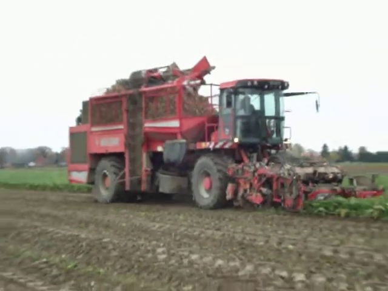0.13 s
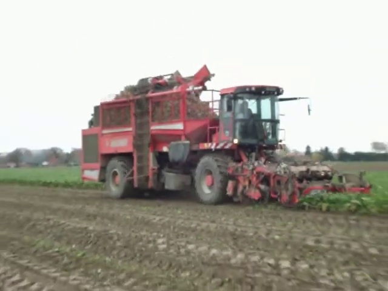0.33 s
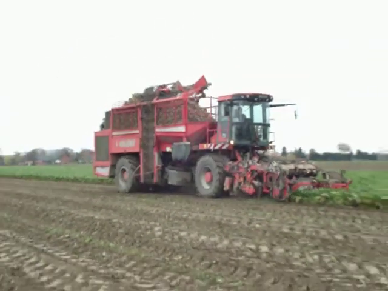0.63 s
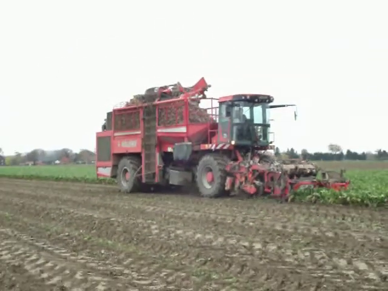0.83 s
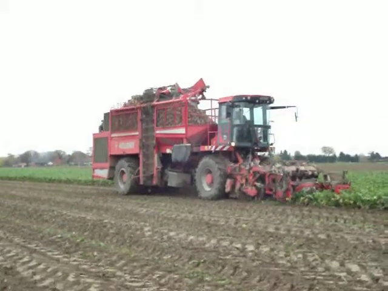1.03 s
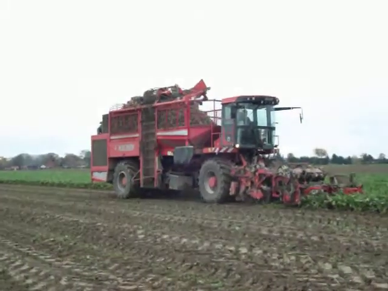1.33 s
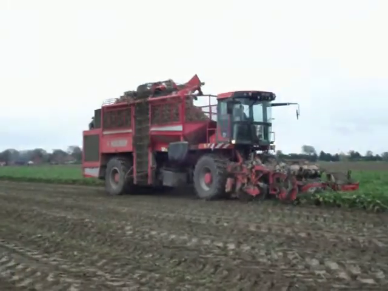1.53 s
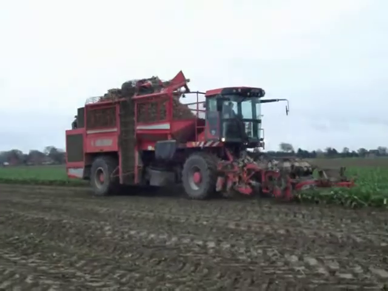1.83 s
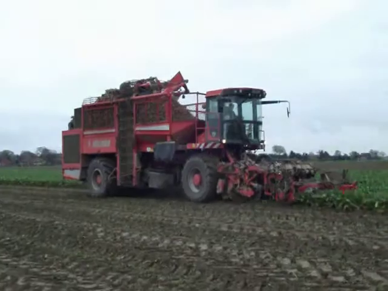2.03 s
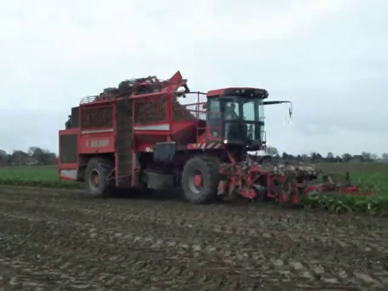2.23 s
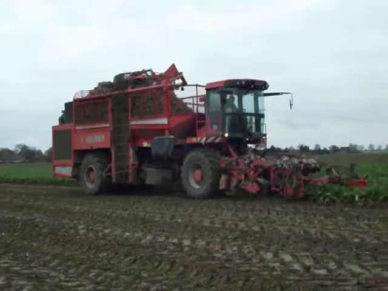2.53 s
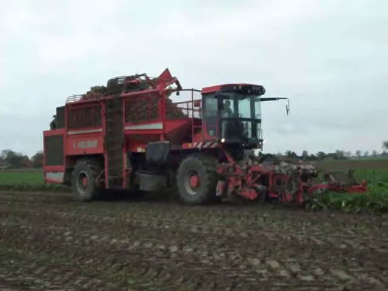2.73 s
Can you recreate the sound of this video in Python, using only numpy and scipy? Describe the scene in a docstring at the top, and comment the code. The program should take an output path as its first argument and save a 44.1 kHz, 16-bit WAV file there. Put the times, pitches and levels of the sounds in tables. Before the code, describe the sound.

A large harvester drones, whines and rattles steadily while wind buffets the microphone.

```python
"""A beet harvester works across a field at steady revs: diesel drone, whining drives, rattling sieve chain.
From the start, wind buffets the microphone; each gust pushes a fast limiter down, so the machine's roar
flutters and ducks. The chain clatters hardest under load near 0.8 s. Small eddies knock on the
microphone at about 1.3, 2.1 and 2.6 s, and a drive shaft's whine swells towards the end."""
import sys
import numpy as np
from scipy import signal
from scipy.fft import rfft, irfft, next_fast_len
from scipy.io import wavfile
from scipy.ndimage import uniform_filter1d, minimum_filter1d, map_coordinates

SR = 44100
rng = np.random.default_rng(int(sys.argv[2]) if len(sys.argv) > 2 else 0)


def digitize_waveform(pressure):
    """Quantize a signal to 16-bit integers and store it at the path in sys.argv[1].

    Rows of a 2-D input are taken as channels; values are limited to [-1, 1].
    """
    field = np.atleast_2d(pressure).T
    bounded = np.clip(field, -1, 1)
    quanta = np.round(bounded * 32767).astype(np.int16)
    wavfile.write(sys.argv[1], SR, quanta)


N = 126567
T = np.arange(N) / SR

# tone colour of the chain's struck steel: frequency_hz, relative_db
STEEL_SPECTRUM = [(300, -15), (600, 3.5), (1300, 3.5), (2200, 1), (2800, 4.5), (3200, 7), (3550, -1.5),
                  (4200, -12.5), (5100, -17), (5900, -30)]


def amp(db):
    """Decibels to gain."""
    return 10 ** (np.asarray(db) / 20)


def unit(x):
    """Scale to rms 1."""
    return x / np.sqrt(np.mean(x ** 2) + 1e-20)


def curve(rows):
    """One value per sample from (time_s, value) points."""
    return np.interp(T, *np.transpose(rows))


def wobble(rate):
    """A smooth random curve, rate knots a second."""
    return map_coordinates(rng.standard_normal(1024), [T * rate + 2], mode="wrap")


def filtered(x, response):
    """Filter x with a gain given as a function of frequency."""
    size = next_fast_len(N + 8192)
    return irfft(rfft(x, size) * response(np.fft.rfftfreq(size, 1 / SR)), size)[:N]


def coloured(x, spectrum):
    """x through (frequency_hz, relative_db) points, rolled off above the last, at rms 1."""
    points_hz, db = np.transpose(spectrum)
    shape = lambda hz: amp(np.interp(np.log(hz + 1), np.log(points_hz + 1), db))
    return unit(filtered(x, lambda hz: shape(hz) / (1 + (hz / points_hz[-1]) ** 20)))


def noise(spectrum):
    """Noise of the given spectrum, at rms 1."""
    return coloured(rng.standard_normal(N), spectrum)


def tone(hz, flicker_db):
    """A sine of about rms 1 that follows hz and flickers in the moving air."""
    cycles = np.cumsum(hz) / SR + rng.random()
    return np.sqrt(2) * np.sin(2 * np.pi * cycles) * amp(flicker_db * wobble(6.98))


def wind():
    """Eddies rumble and flutter on the microphone, as strong as the breeze plus the gusts."""
    # deep rumble and the flutter above it: frequency_hz, relative_db
    rumble_spectrum = [(4, -17), (12, 2), (38, 3), (60, -0.5), (85, -9), (115, -19), (200, -34),
                       (400, -52.5)]
    flutter_spectrum = [(60, -7.5), (110, 3), (150, -1), (200, -6.5), (290, -8.5), (420, -20.5),
                        (900, -42.5)]
    # flutter against the rumble: time_s, level_db
    flutter_level = [(0, -13), (.3, -11.5), (.68, -10.5), (.82, -15), (1.05, -15), (1.28, -8), (1.55, -9.5),
                     (1.8, -14), (2.35, -16), (2.55, -11), (2.75, -15.5), (2.87, -12)]
    # wind between gusts: time_s, level_db
    breeze = [(0, -2.5), (.2, -4), (.55, -10), (.7, -10.5), (.83, -7), (.95, -2.5), (1.17, -10.5),
              (1.3, -4), (1.55, -9.5), (1.8, -7.5), (2.0, -3.5), (2.25, -7), (2.45, -7.5), (2.65, -8),
              (2.87, -2)]
    # gusts and brief lulls: centre_s, half_length_s, over_breeze_db
    gusts = [(.01, .015, 7.5), (0.076, 0.042, 9), (0.159, 0.029, -2.5), (0.406, 0.012, -7.5),
             (0.283, 0.0094, 11), (0.363, 0.015, 11), (.49, 0.078, 8), (0.606, 0.024, 10.5),
             (0.724, 0.0061, 16.5), (0.888, 0.013, 8), (1.29, 0.018, -6.5), (1.365, 0.018, 9),
             (1.388, 0.0066, 2.5), (1.469, 0.043, 9.5), (1.525, 0.013, -13.5), (1.572, .03, 17.5),
             (1.673, 0.038, 11), (1.723, 0.014, -4), (1.743, 0.0088, 14), (1.779, 0.031, -3.5),
             (2.035, 0.01, 9), (2.153, 0.031, 2.5), (2.318, 0.048, 12.5), (2.448, 0.018, -9.5),
             (2.488, 0.018, 8), (2.718, 0.032, 7.5), (2.772, 0.018, 14), (2.828, .012, -7),
             (2.84, 0.01, 11.5)]
    gust_db = sum(db * np.exp(-((T - centre) / half) ** 2) for centre, half, db in gusts)
    eddies = noise(rumble_spectrum) + amp(curve(flutter_level)) * noise(flutter_spectrum)
    power = np.abs(uniform_filter1d(uniform_filter1d(eddies ** 2, size=1300), size=900))
    even_eddies = eddies / np.sqrt(power + 0.015)  # levelled, so breeze and gusts shape the swells
    return amp(curve(breeze) + gust_db) * even_eddies


def wind_thumps(half_length_s=0.016):
    """Small eddies hit the microphone: short, dull knocks that reach higher than the rumble."""
    # eddy knocks: centre_s, level_db, upper_edge_hz
    knocks = [(1.33, -10.5, 330), (2.117, -13, 167.6), (2.557, -9, 254)]
    thumps = np.zeros(N)
    for centre_s, level_db, edge_hz in knocks:
        envelope = amp(level_db) * np.exp(-((T - centre_s) / half_length_s) ** 2)
        thumps += envelope * noise([(80, -14), (130, 0), (edge_hz, -3), (2 * edge_hz, -26)])
    return thumps


def rattles(hits_per_s=120, scatter_db=0.5, t60_s=0.0098, level_db=-26):
    """Stones and loose parts tick against the steel at random."""
    hits = (rng.random(N) < hits_per_s / SR) * amp(scatter_db * rng.standard_normal(N))
    envelope = signal.lfilter([1], [1, -amp(-60 / (t60_s * SR))], hits)
    return amp(level_db) * coloured(envelope * rng.standard_normal(N), STEEL_SPECTRUM)


def drives(speed, drift=0.002786):
    """Pumps, gears, rotors and a shaft whine along with the engine, each drifting under its own load."""
    # pumps, gears and rotors at normal revs: pitch_hz, level_db
    whines = [(270, -27), (468, -39), (518, -31), (540.5, -37), (603, -40.5), (811, -41.5), (1063, -35.5),
              (3232, -35)]
    # drive shaft whine, growing as the machine works on: time_s, level_db
    shaft_level = [(0, -39), (.8, -34.5), (1.6, -37.5), (2.2, -38), (2.55, -32.5), (2.87, -26)]
    shaft_hz = 906
    whine = lambda hz: tone(hz * speed * (1 + drift * wobble(9)), flicker_db=1.5)
    return sum(amp(db) * whine(hz) for hz, db in whines) + amp(curve(shaft_level)) * whine(shaft_hz)


def sieve_chain(speed):
    """Steel clatter swells as each slat passes over the rollers, louder under load, and rings the rods."""
    # load on the chain: time_s, boost_db
    load = [(0, 0), (.4, -2), (.68, -1), (.82, 3), (1.2, -1.5), (1.5, 0.5), (1.85, -0.5), (2.25, 0),
            (2.45, 0), (2.7, -2.5), (2.87, -2)]
    slat_hz, swing_db, scatter_db, base_db = 30.86, 3.5, 1.2, -22.5
    ring_hz, ring_width_hz, ring_vs_clatter_db = 3241, 83, -12
    slats_passed = np.cumsum(slat_hz * speed * (1 + 0.032 * wobble(6.6))) / SR
    swell = amp(swing_db * np.cos(2 * np.pi * slats_passed) + scatter_db * wobble(60))
    clatter = unit(swell * noise(STEEL_SPECTRUM))
    rod_resonance = lambda hz: 1j * hz * ring_width_hz / (ring_hz ** 2 - hz ** 2 + 1j * hz * ring_width_hz)
    ring = unit(filtered(swell * noise(STEEL_SPECTRUM), rod_resonance))
    return amp(base_db + curve(load)) * (clatter + amp(ring_vs_clatter_db) * ring)


def engine(firing_hz, roar_db=-21.5):
    """The diesel's exhaust drones on harmonics of the firing rate; its roar swells a little each firing."""
    # exhaust harmonics: firing_multiple, level_db
    harmonics = [(1, -15), (2, -25.5), (3, -38), (4, -34.5), (7, -43), (8, -34.5), (12, -37), (16, -37.5),
                 (17, -37), (34, -45.5)]
    # broad machine roar: frequency_hz, relative_db
    roar_spectrum = [(60, 7), (250, 12), (400, -11), (600, 0), (1000, -5), (1600, -3), (2200, 2),
                     (2800, -2.5), (3150, 0.5), (3550, -17), (4000, -9.5), (4300, -16), (5100, -38.5),
                     (5900, -68.5)]
    drone = sum(amp(db) * tone(multiple * firing_hz, flicker_db=2.5) for multiple, db in harmonics)
    throb = 1 + 0.037 * np.cos(2 * np.pi * np.cumsum(firing_hz) / SR)
    return drone + amp(roar_db) * unit(throb * noise(roar_spectrum))


def scene():
    """The harvester at steady revs, and the wind on the microphone, in mono."""
    # engine firing rate: time_s, rate_hz
    firing_rate = [(0, 70.7), (.3, 71.27), (1.3, 71.52), (1.8, 71.17), (2.5, 70.65), (2.87, 71.12)]
    firing_hz = curve(firing_rate) * (1 + 0.002 * wobble(10))
    speed = firing_hz / firing_hz.mean()
    harvester = engine(firing_hz) + drives(speed) + sieve_chain(speed) + rattles()
    return (harvester + wind() + wind_thumps())[None]


def record(dry):
    """A fast limiter ducks everything under each wind peak; the sharpest tips slip past it and clip."""
    threshold_db, attack_s, release_db_per_s, lowpass_hz = -4, 0.0022, 260, 15800
    over_db = 20 * np.log10(np.maximum(np.abs(dry[0]) / amp(threshold_db), 1))
    release_ramp_db = release_db_per_s * T
    duck_db = np.maximum.accumulate(over_db + release_ramp_db) - release_ramp_db
    attack_samples = int(attack_s * SR)
    gain_db = uniform_filter1d(minimum_filter1d(-duck_db, attack_samples * 2 // 3), attack_samples)
    ceiling = 0.995 * amp(threshold_db)
    limited = np.clip(dry[0] * amp(gain_db), -ceiling, ceiling)
    return filtered(limited, lambda hz: hz < lowpass_hz)[None]


dry = scene()
out = record(dry)
digitize_waveform(out)
```